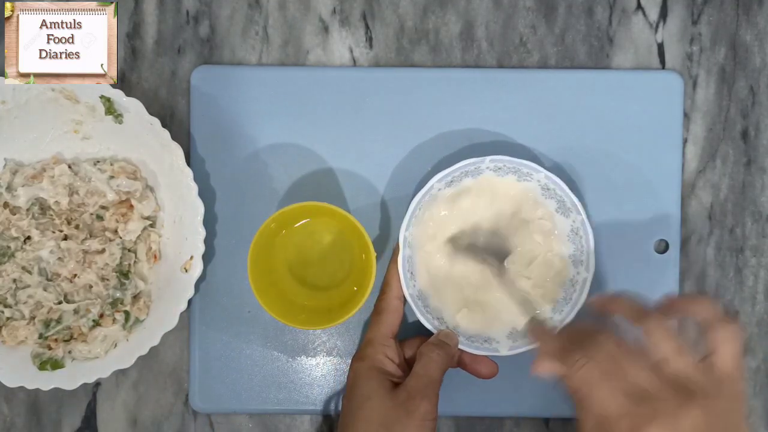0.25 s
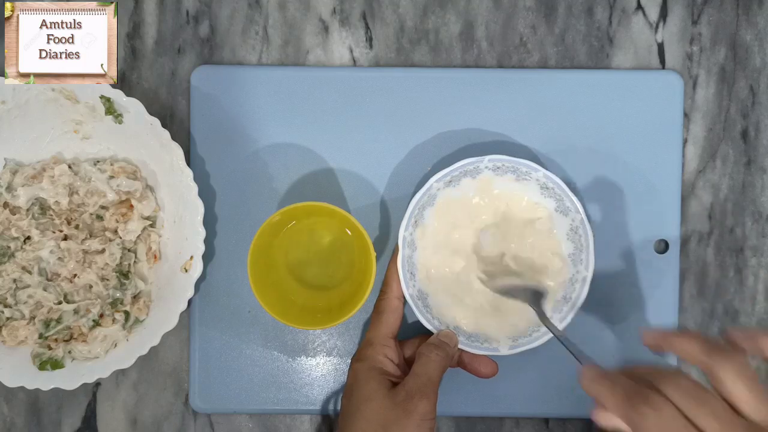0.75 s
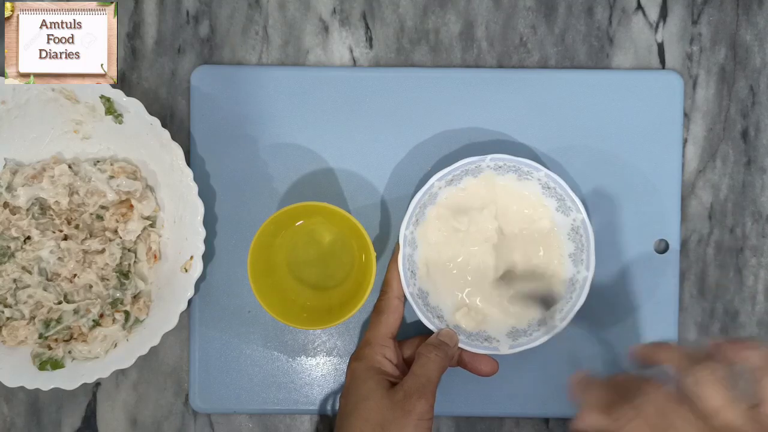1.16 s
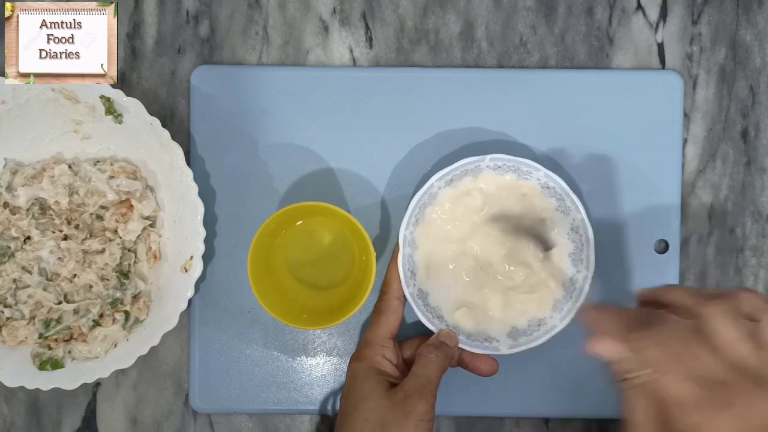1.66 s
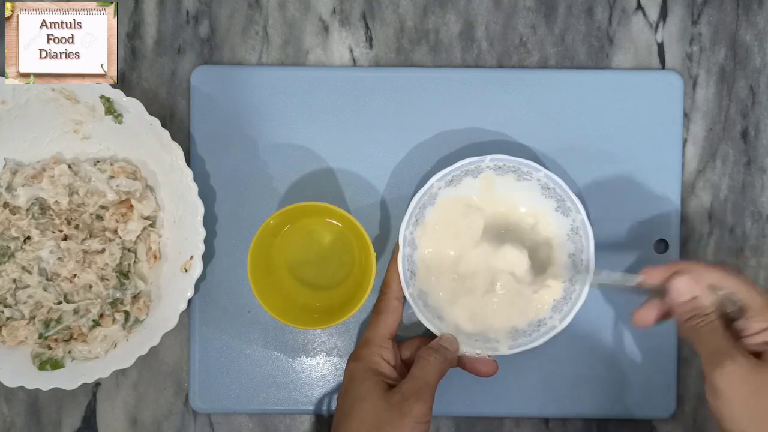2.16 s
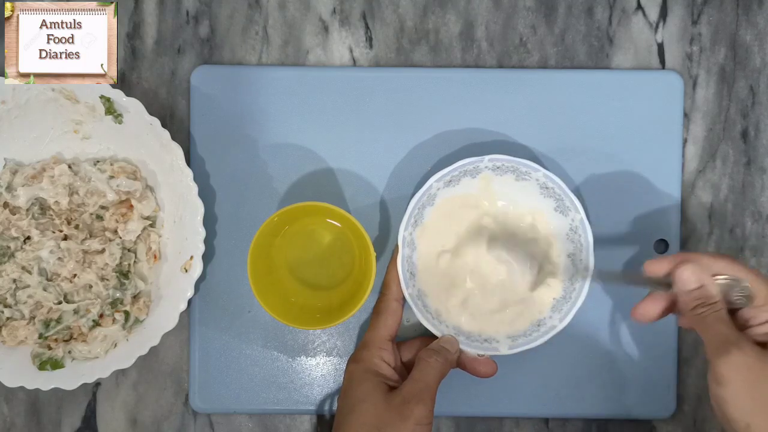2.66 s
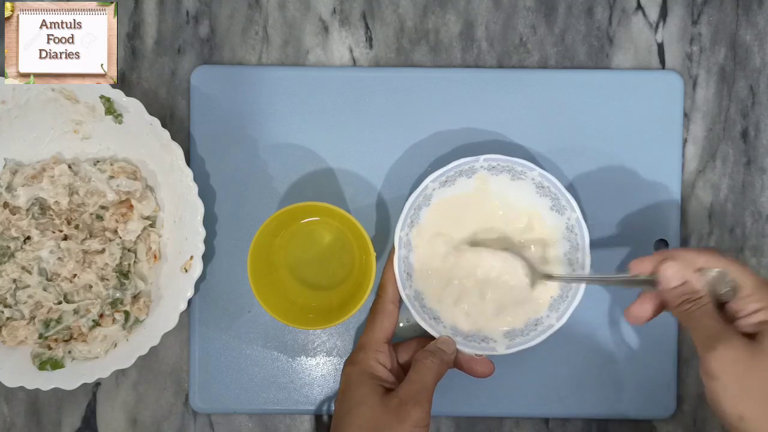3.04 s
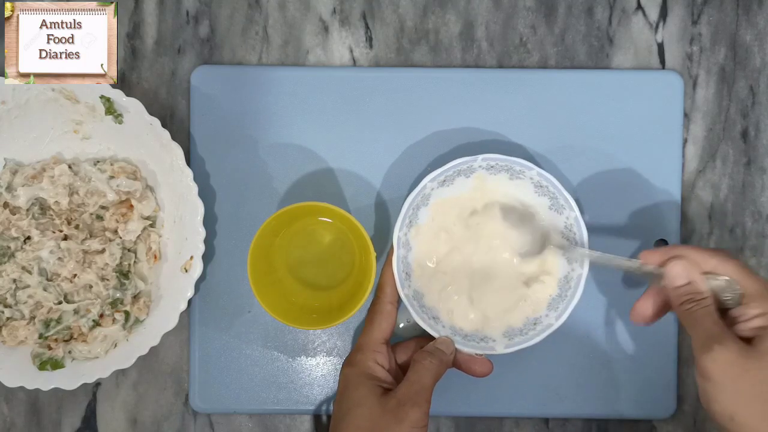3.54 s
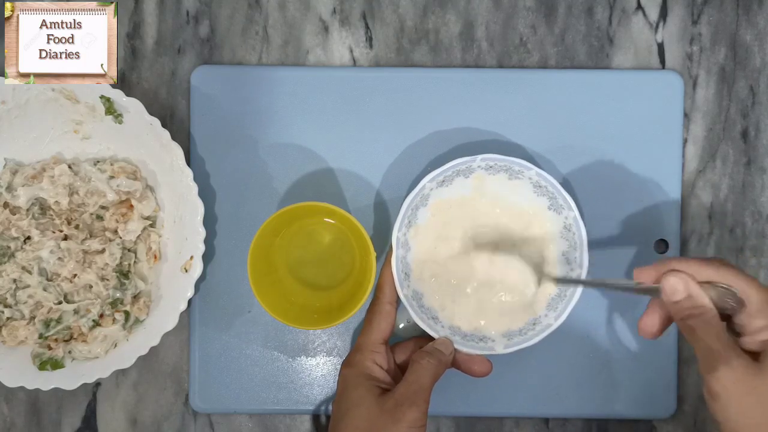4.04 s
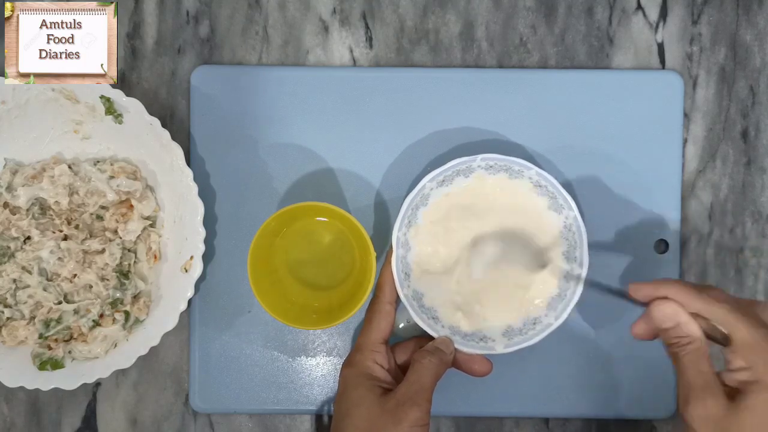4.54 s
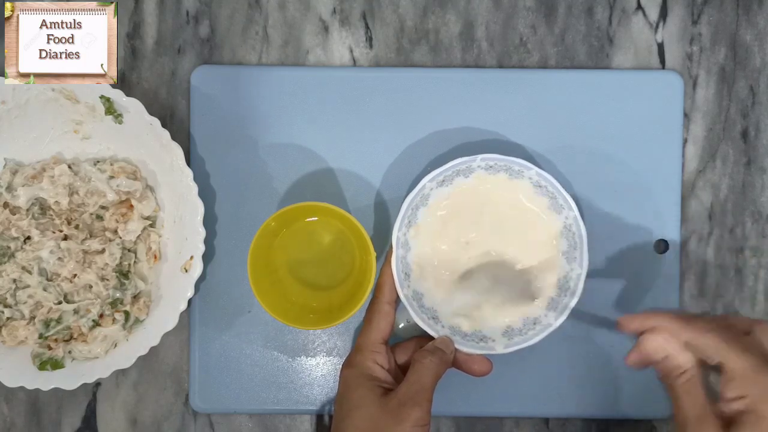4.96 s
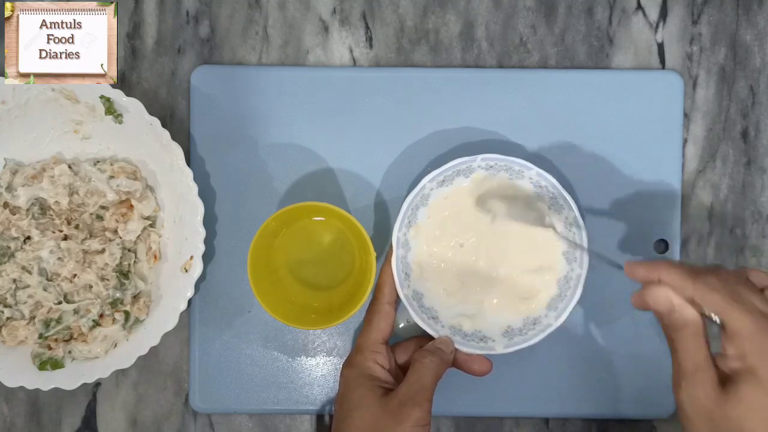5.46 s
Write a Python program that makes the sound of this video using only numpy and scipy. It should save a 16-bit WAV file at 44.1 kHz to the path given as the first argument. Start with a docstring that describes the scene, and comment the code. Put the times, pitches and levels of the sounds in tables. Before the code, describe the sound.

Dull spoon taps and faint wet scrapes in a paste-filled ceramic bowl turn into brisk, brighter clanks, with kitchen echo and a steady low rush.

```python
"""A metal spoon works a thick paste in a small ceramic bowl, in a hard-walled kitchen, heard by a phone.
Soft drags and scattered dull two-tone knocks come first, with an early ring and a brief far drone.
From about 2.7 s the blows are mostly louder: the bare rim rings, handle or board twangs, deep thumps sound.
Knocks, rings and twangs are fading sine tones; cracks and drags are coloured noise. The room echoes them all.
Throughout, coloured noise and a wavering tone make the rush, hiss and hum of appliances."""
import sys
import numpy as np
from scipy import signal
from scipy.fft import rfft, irfft
from scipy.io import wavfile

SR = 44100
rng = np.random.default_rng(int(sys.argv[2]) if len(sys.argv) > 2 else 0)


def voltage_ratio(level):
    """Linear amplitude factor for a level in decibels (scalar or array-like)."""
    return 10 ** (np.asarray(level, float) / 20)


def int16_out(signal):
    """Quantize to a 16-bit WAV file."""
    q = np.round(np.clip(np.atleast_2d(signal).T, -1, 1) * 32767)
    wavfile.write(sys.argv[1], SR, q.astype(np.int16))


N = 250929  # length in samples
T = np.arange(N) / SR  # time in seconds

# Spoon blows. Each row: time in seconds, level in dB, low knock in Hz, high knock in dB over the low one,
# crack in dB over the blow's level.
BLOWS = [(0.0572, -35.5, 1560, -1.5, -25), (0.1512, -51.5, 1780, -2, -13), (0.2952, -45, 2370, -11, -21),
         (0.318, -49, 1550, -5, -19), (0.3575, -33, 1564, 1.5, -22), (0.5178, -64, 2870, 6, -4),
         (0.7243, -26, 2330, 5, -2.5), (1.1235, -22.5, 1617, 4.5, -12), (1.278, -24, 2520, -23, -5.5),
         (1.4434, -27.5, 1583, 5.5, -18), (1.648, -45, 1900, 3, -8), (1.6895, -24, 2850, -11, -13),
         (2.0025, -41.5, 1870, 6.5, -4.5), (2.0441, -32, 2000, -30, -22), (2.0807, -41, 2300, -16, -3.5),
         (2.186, -62.5, 2500, -16.5, 2.5), (2.2967, -33, 1950, 5.5, 2), (2.3516, -33, 1470, -15, -15.5),
         (2.45, -54.5, 1910, 14, 0.5), (2.5595, -24.5, 2480, -28, -14.5), (2.681, -48.5, 2480, 5, -4),
         (2.727, -47.5, 3460, -20, -18), (2.7497, -12.5, 2437, -18, -17.5),
         (2.8998, -19.5, 1790, -22, -18.5), (2.92, -44, 3880, -20, -19), (2.9519, -20, 2790, 3.5, -4),
         (3.102, -30, 1880, -13, -36), (3.1518, -17, 1637, 2.5, -8.5), (3.27, -40.5, 2100, 14, -6),
         (3.3042, -24, 1900, -33, -17), (3.3527, -21.5, 2137, 0, -20.5), (3.474, -51.5, 2170, -16, -5.5),
         (3.5075, -17, 1960, -26, -19), (3.556, -33.5, 1725, -2.5, -28), (3.685, -51, 2770, 6, -8.5),
         (3.708, -20.5, 2016, -5, -19), (3.7554, -20.5, 2215, 3, -23), (3.919, -17, 2165, -17, -20),
         (4.1081, -15.5, 2067, -4.5, -14), (4.1741, -15.5, 2256, -5.5, -17.5), (4.377, -19, 2700, 7.5, -4),
         (4.6386, -17, 2910, -30, -1.5), (4.6888, -17.5, 1730, -1, -18.5), (4.865, -19, 2600, -27, -1),
         (4.905, -27.5, 2190, -20, -11), (5.029, -59.5, 2500, -9, 15), (5.0748, -16.5, 1705, 10, -6),
         (5.3111, -27.5, 1750, -9.5, 4), (5.6, -63, 2520, -9, 8), (5.6801, -27, 1925, 15.5, 0.5)]
OVERTONE_RATIO = 1.77  # the choked bowl's high knock over its low one
# Crack of metal on glaze. Each row: frequency in Hz, gain in dB.
CRACK_COLOUR = [(70, -33), (150, -11), (280, 14), (500, -6), (1000, 10.5), (3000, 20.5), (5000, 13.5),
                (7500, 15.5), (9500, 5.5), (12000, 0), (14000, 6.5), (15500, -2), (17000, -41)]
# Rings of the bare rim, some from the spoon bouncing and rattling on the rim just after a blow; each favours
# one ring shape and starves the others. Each row: time in seconds, level in dB, favoured shape (0 lowest, 4
# highest), loss in dB one shape away (it grows with the square of the distance).
RIM_RINGS = [(0.721, -26, 1.95, 22), (2.948, -39, 0.4, 1.4), (3.150, -45, 0.9, 1.1),
             (4.376, -15.5, 1.4, 0.9), (4.388, -21, 2.2, 6), (4.412, -24, 3.1, 8), (4.637, -17, 2.1, 3.5),
             (4.688, -24, -0.6, 5), (4.862, -18, 1.8, 5), (4.905, -28, 1.1, 5), (5.074, -17, 2.7, 2.5),
             (5.087, -19, 2.6, 2.5), (5.312, -19, 2.6, 1.1), (5.322, -20, 2.7, 1.5), (5.338, -23, 2.6, 2.5),
             (5.383, -26, 3.0, 9), (5.676, -30, 0.8, 1.1)]
# Ringing modes of the bowl. Each row: frequency in Hz, relative level in dB, seconds to fade by 60 dB.
BOWL_MODES = [(1307, -7, 0.038), (2854, 1.5, 0.086), (2850, -6.5, 0.045), (2861, -13, 0.26),
              (2834, -4.5, 0.2), (2990, -0.5, 0.03), (4978, -2, 0.049), (4963, -12, 0.18),
              (4870, -15.5, 0.17), (7206, 11, 0.022), (7530, 11, 0.017), (7390, -12, 0.049),
              (7510, 9, 0.057), (7960, -11, 0.11), (8230, 4, 0.017), (10380, -4.5, 0.02),
              (10490, -9.5, 0.068), (9700, -32, 0.026), (12800, -27, 0.033), (13800, -3, 0.025),
              (12500, -19, 0.021)]
# Frequencies in Hz that divide the bowl modes into the five ring shapes.
SHAPE_TOP_HZ = [2000, 4000, 6000, 8000]

# Twangs of the handle. Each row: time in seconds, level in dB.
HANDLE_TWANGS = [(2.900, -54), (3.303, -52), (3.507, -60), (3.706, -54.5), (3.921, -52), (4.108, -56.5)]
HANDLE_HZ, HANDLE_T60_S = 925.6, 0.38
# Knocks of the bowl on the board. Each row: time in seconds, level in dB.
BOARD_KNOCKS = [(2.045, -43), (4.637, -43.5), (4.863, -55)]
BOARD_HZ, BOARD_T60_S = 275, 0.12
# Very deep short thumps under three of the blows. Each row: time in seconds, level in dB.
DEEP_THUMPS = [(4.377, -41), (5.073, -43), (5.312, -41.5)]
THUMP_HZ, THUMP_T60_S = 45, 0.07
# A lone ping and a lone clonk. Each row: time in seconds, level in dB, frequency in Hz,
# seconds to fade by 60 dB.
LONE_RINGS = [(0.726, -34, 4100, 0.04), (3.920, -34, 724.6, 0.057)]

# The spoon dragging through paste along the wall. Each row: start in seconds, hold in seconds, level in dB.
STROKES = [(0.0, 0.065, -62), (0.171, 0.022, -67.5), (0.321, 0.022, -58), (1.46, 0.19, -63.5),
           (1.659, 0.028, -58), (2.043, 0.014, -63), (2.695, 0.27, -75.5)]
STROKE_RISE_DB_PER_S, STROKE_FALL_DB_PER_S = 450, 196
# Lumps catching the edge: how many a second, level against the wavering hiss of the drag, scatter of sizes.
GRIT_PER_S, GRIT_DB, GRIT_SPREAD_DB = 200, -8.5, 2

# Colour of the low rush. Each row: frequency in Hz, relative level in dB per Hz.
RUSH_COLOUR = [(15, -59), (25, -9), (75, -5), (107, -11.5), (124, 0), (181, -5), (292, -19.5), (394, -13),
               (425, -14.5), (500, -27.5), (650, -69), (1100, -120)]
# Colour of the hiss. Each row: frequency in Hz, relative level in dB per Hz.
HISS_COLOUR = [(290, -14), (500, 2), (586, 1), (613, -10), (668, 6), (1140, -9.5), (3020, -18), (6700, -19),
               (10400, -22.5), (11500, -25), (16000, -26.5)]
RUSH_DB, HISS_DB = -56.5, -66.5  # level of the part shared by left and right
# Faint hum bands. Each row: centre in Hz, width in Hz, level in dB.
HUM_BANDS = [(127.3, 11.6, -65), (252, 17.5, -65), (320, 68, -64.5)]
MOTOR_HZ, MOTOR_DB = 100.6, -53.5  # middle values that the motor tone wavers around
# A brief far drone. Each row: time in seconds, frequency in Hz, level in dB.
DRONE = [(.74, 400, -70), (.8, 400, -66), (.88, 398, -53.5), (1.1, 394, -56.5), (1.2, 393, -59),
         (1.3, 396, -79)]

# Bands of the room's tail. Each row: centre in Hz, seconds to fade by 60 dB, relative level in dB.
ROOM_BANDS = [(260, 0.29, -5), (686, 0.33, -2.5), (1240, 0.5, -7), (2510, 0.5, -13), (4220, 0.56, -14),
              (8700, 0.49, -15.5), (14000, 0.35, -21)]
# First echoes. Each row: delay in seconds, left level in dB, right level in dB.
FIRST_ECHOES = [(.003, -64, -1.5), (.010, -6, -14), (0.012, -74, -10)]
KNOCK_TO_ROOM_DB = -8  # the cup of the bowl throws its knocks up at the phone, less into the room


def blows():
    """Paste chokes the bowl: two knocks a few cycles long, and a broad crack of metal on glaze."""
    knocks, cracks = np.zeros((2, 2, N + SR))
    size, lead = 2048, 64  # samples in a crack, and of room before its onset
    t = np.arange(size) / SR
    bins_hz = np.maximum(np.arange(size // 2 + 1) * SR / size, 1)
    crack_gain = colour(CRACK_COLOUR)(bins_hz)
    own = np.clip(bins_hz / 3000, 0.15, 1)  # left and right hear the treble along different paths
    shared = np.sqrt(1 - own ** 2)
    phase_chance = rng.standard_normal((len(BLOWS), 7))
    crack_fade = np.exp(-t / 0.00062) + 0.15 * np.exp(-t / 0.0072)
    bursts = rng.standard_normal((len(BLOWS), 3, size)) * crack_fade
    for (s, db, low_hz, high_db, crack_db), chance, burst in zip(BLOWS, phase_chance, bursts):
        # four tones make the low knock, three the high one
        low_tones = low_hz * np.array([0.45, 0.75, 1, 1.2])
        high_tones = OVERTONE_RATIO * low_hz * np.array([0.85, 1, 1.22])
        hz = np.r_[low_tones, high_tones]
        gain_db = db + np.r_[-20, -7, 3, -5, high_db + np.array([-5, 3, -5])]
        t60 = np.r_[0.02, 0.011, 0.013, 0.009, 0.008, 0.010, 0.007]
        apart = np.clip(hz / 2500, 0, 3) * chance
        # a cushioned blow, with little crack, pushes longer and rings hollower
        soft = 1 + np.clip(-crack_db - 15, 0, 12) / 24
        add_ring(knocks, s - 0.000838 * soft, hz, gain_db + 2.75 * (soft - 1), t60 * soft,
                 0.00084 * soft ** 0.48, (0 * apart, apart))

        both, left, right = rfft(np.roll(burst, lead, axis=1), axis=1) * crack_gain
        crack = irfft(shared * both + own * np.array([left, right]), size)
        i = int((s - 0.0008) * SR) - lead
        cracks[:, i:i + size] += voltage_ratio(db + crack_db) * crack
    return knocks[:, :N], cracks[:, :N]


def rim():
    """The free rim rings in closely spaced modes; fingers and paste soon quiet it."""
    out = np.zeros((2, N))
    hz, mode_db, t60 = np.transpose(BOWL_MODES)
    shape = np.searchsorted(SHAPE_TOP_HZ, hz)
    chance = rng.standard_normal((len(RIM_RINGS), 4, len(BOWL_MODES)))
    for (s, db, favoured, loss_db), (level, pitch, phase, apart) in zip(RIM_RINGS, chance):
        gain_db = db - loss_db * (shape - favoured) ** 2 + mode_db + 0.2 * level
        left_phase = 9 * phase
        right_phase = left_phase + np.clip(hz / 4000, 0, 3) * apart
        add_ring(out, s, hz * (1 + 0.0037 * pitch), gain_db, t60, 0.0025, (left_phase, right_phase))
    # the ring flutters as spoon and fingers keep touching the bowl
    return out * voltage_ratio(1.66 * wander(54))


def handle():
    """The spoon handle bends to and fro and twangs."""
    return close_pairs([(s, db, HANDLE_HZ, HANDLE_T60_S) for s, db in HANDLE_TWANGS])


def board():
    """The board under the bowl bends and gives a short low knock."""
    return close_pairs([(s, db, BOARD_HZ, BOARD_T60_S) for s, db in BOARD_KNOCKS])


def deep_thumps():
    """A deep thump, fading fast."""
    return close_pairs([(s, db, THUMP_HZ, THUMP_T60_S) for s, db in DEEP_THUMPS])


def lone_rings():
    """One ping and one clonk, each a fading pair of tones."""
    return close_pairs(LONE_RINGS)


def drag():
    """The spoon edge slides through paste: a grainy hiss and catching lumps, coloured by the choked bowl."""
    def body(f):
        low = 1 / (1 + ((f - 1700) / 180) ** 2)
        middle = 0.29 / (1 + ((f - 2400) / 250) ** 2)
        high = 0.28 / (1 + ((f - 3600) / 700) ** 2)
        return low + middle + high

    lumps = (rng.random(N) < GRIT_PER_S / SR) * voltage_ratio(GRIT_SPREAD_DB * rng.standard_normal(N))
    bins_hz = np.arange(N // 2 + 1) * SR / N
    lump_gain = body(bins_hz * 0.73) + 0.085 * (bins_hz > 1000)  # bowl colour moved up, plus even treble
    ticks = unit(irfft(rfft(lumps) * lump_gain, N))
    hiss = shaped(body, N) * voltage_ratio(6.5 * wander(55))
    return (hiss + voltage_ratio(GRIT_DB) * ticks) * strokes() * np.ones((2, 1))


def strokes():
    """Pressure of the spoon on the wall: each stroke rises, holds and dies away."""
    s, hold, db = np.transpose(STROKES)[:, :, None]
    rise_db = STROKE_RISE_DB_PER_S * np.maximum(s - T, 0)
    fall_db = STROKE_FALL_DB_PER_S * np.maximum(T - s - hold, 0)
    return voltage_ratio(db - rise_db - fall_db).max(0)


def room(x):
    """First echoes off counter and walls, then a dense tail that dies band by band."""
    size = SR // 2
    t = np.arange(size) / SR
    tail = np.zeros((2, size))
    for hz, t60, db in ROOM_BANDS:
        band = lambda f: np.exp(-0.5 * (np.log2(f / hz) / 0.45) ** 2)
        shared, left, right = (shaped(band, size) for _ in range(3))
        own = np.clip(hz / 1200, 0.3, 1)  # left and right differ more towards the treble
        noise = np.sqrt(1 - own ** 2) * shared + own * np.array([left, right])
        fade = np.exp(-np.log(1000) * t / t60) * np.clip(t / 0.015, 0, 1)
        even = 4 * np.sqrt(hz / SR / (t60 * SR / 14))  # allows for the band's width and length
        tail += voltage_ratio(db) * even * fade * noise
    for s, left_db, right_db in FIRST_ECHOES:
        tail[:, int(s * SR)] += voltage_ratio([left_db, right_db])
    return signal.fftconvolve(x, tail, axes=1)[:, :N]


def rush():
    """Appliances make a steady low rush and a hiss, both coloured noise."""
    return air(RUSH_COLOUR, RUSH_DB, -11) + air(HISS_COLOUR, HISS_DB, -3)


def hum():
    """Faint narrow bands of noise hum steadily."""
    out = np.zeros(N)
    for hum_hz, width_hz, hum_db in HUM_BANDS:
        out += voltage_ratio(hum_db) * shaped(lambda f: 1 / (1 + (2 * (f - hum_hz) / width_hz) ** 2), N)
    return out


def motor():
    """A motor tone wavers in pitch and level."""
    hz = MOTOR_HZ * (1 + 0.015 * wander(5.2))
    return np.sin(2 * np.pi * np.cumsum(hz) / SR) * voltage_ratio(MOTOR_DB + 2 * wander(8.2))


def drone():
    """A far tone swells, then sinks in pitch and level."""
    return voltage_ratio(curve(DRONE, 2)) * np.sin(2 * np.pi * np.cumsum(curve(DRONE, 1)) / SR)


def add_ring(out, s, hz, db, t60, push, phase):
    """Fading tones set going by a push of some seconds; phase holds one value per channel and tone."""
    i = int(s * SR)
    t = np.arange(min(int(1.2 * np.max(t60) * SR) + 9, out.shape[1] - i)) / SR
    fade = voltage_ratio(db)[:, None] * np.exp(-np.log(1000) * t / np.asarray(t60)[:, None])
    for c in range(2):
        ring = np.sin(2 * np.pi * np.asarray(hz)[:, None] * t + phase[c][:, None])
        out[c, i:i + len(t)] += (fade * ring).sum(0) * np.minimum(t / push, 1)


def close_pairs(rings):
    """Each row sounds at two nearby pitches, the upper one weaker."""
    out = np.zeros((2, N))
    for s, db, hz, t60 in rings:
        add_ring(out, s, [hz, 1.045 * hz], [db, db - 8.5], [t60, t60], 0.003, np.zeros((2, 2)))
    return out


def air(table, db, side_db):
    """Steady noise, nearly alike left and right in the bass; side_db sets how far they differ."""
    gain = colour(table)
    side = shaped(lambda f: gain(f) * np.clip(f / 1500, 0.18, 1), N) * np.array([[1], [-1]])
    return voltage_ratio(db) * (shaped(gain, N) + voltage_ratio(side_db) * side)


def wander(rate_hz):
    """Slow chance with spread 1; wobbles faster than rate_hz are weak."""
    return shaped(lambda f: 1 / (1 + (f / rate_hz) ** 2), N)


def shaped(gain, size):
    """Noise of rms 1 whose spectrum follows gain(Hz)."""
    hz = np.arange(size // 2 + 1) * SR / size + 1e-3  # just above zero, so logarithms work
    return unit(irfft(rfft(rng.standard_normal(size)) * gain(hz), size))


def colour(table):
    """A spectrum table as a gain function of Hz."""
    hz, db = np.transpose(table)
    return lambda f: voltage_ratio(np.interp(np.log(f), np.log(hz), db))


def curve(table, column):
    """One column of a table along time."""
    return np.interp(T, *np.array(table)[:, [0, column]].T)


def unit(x):
    """Scale to rms 1."""
    return x / np.sqrt(np.mean(x ** 2))


def scene():
    """All but the appliances sounds through the room."""
    knocks, cracks = blows()
    near = cracks + rim() + handle() + board() + deep_thumps() + lone_rings() + drag()
    echoes = room(near + voltage_ratio(KNOCK_TO_ROOM_DB) * knocks)
    kitchen = rush() + hum() + motor() + drone()
    return knocks + near + echoes + kitchen


def band_limit(x):
    """A steep low-pass at the top of the band."""
    return signal.sosfilt(signal.butter(12, 16680, fs=SR, output="sos"), x)


def record(dry):
    """The left is a little quieter and duller at the top; loud peaks are rounded, the top is cut."""
    top = signal.sosfilt(signal.butter(2, 10000, "highpass", fs=SR, output="sos"), dry)
    ports = (dry + np.array([[-0.4], [0.5]]) * top) * voltage_ratio([[-0.3], [0.3]])
    rounded = np.tanh(1.3 * ports) / 1.3
    cut = signal.sosfilt(signal.butter(8, 15600, fs=SR, output="sos"), rounded)
    return band_limit(cut)


dry = scene()
out = record(dry)
int16_out(out)
```